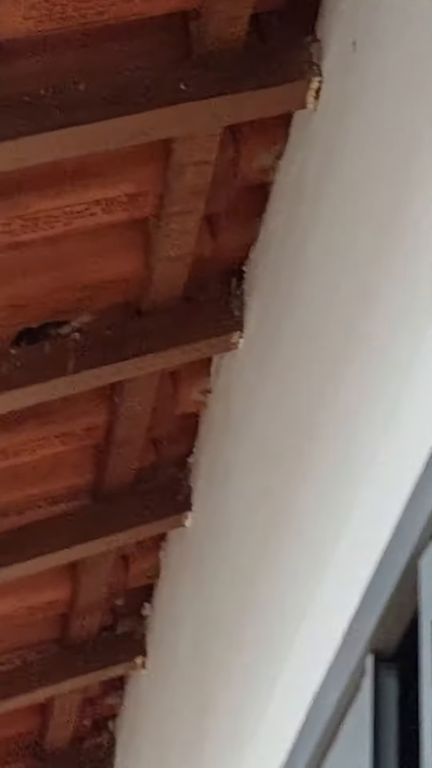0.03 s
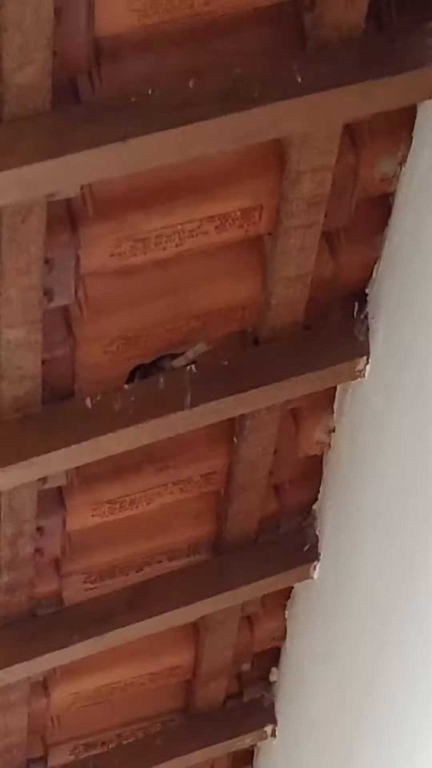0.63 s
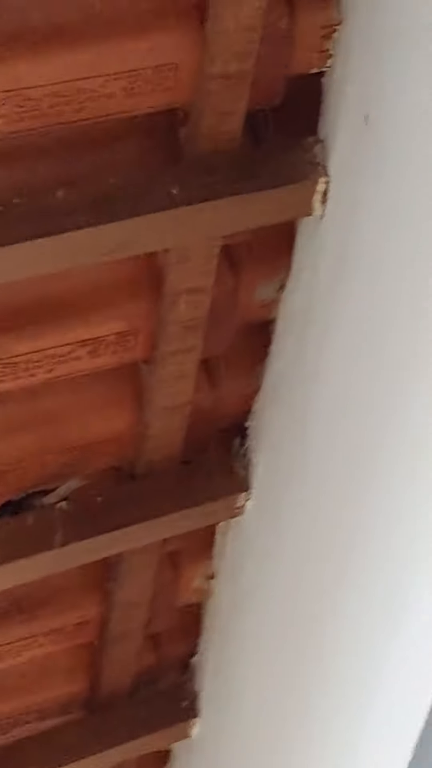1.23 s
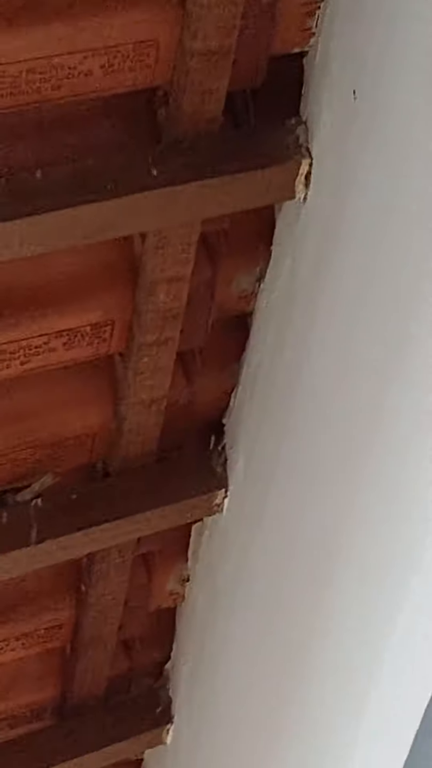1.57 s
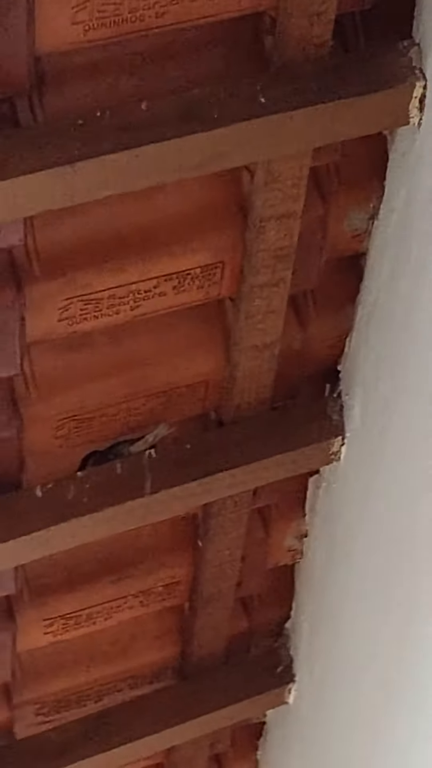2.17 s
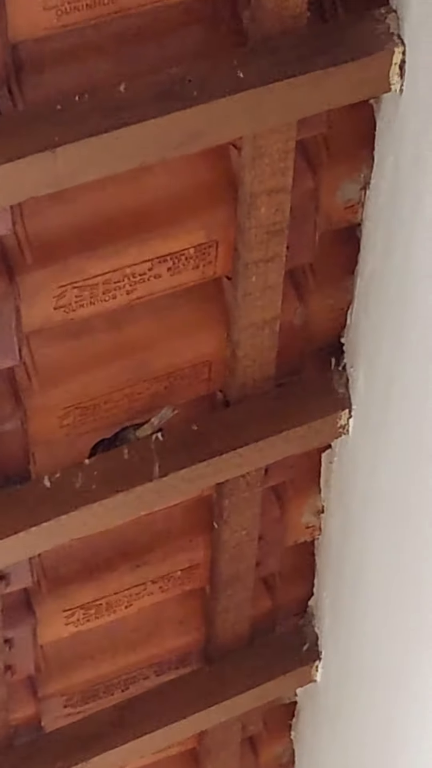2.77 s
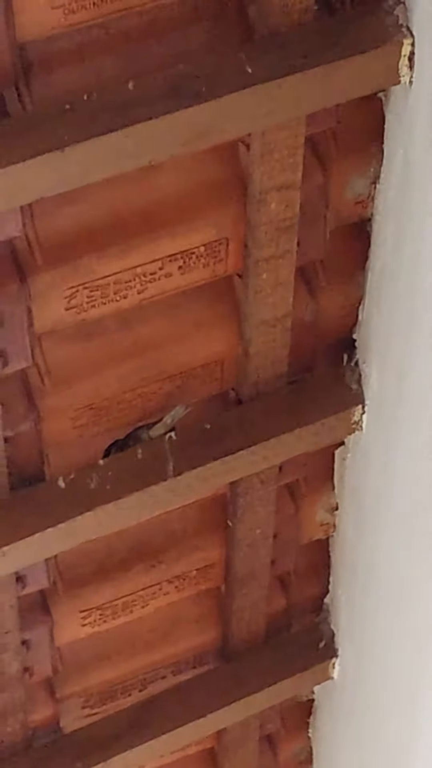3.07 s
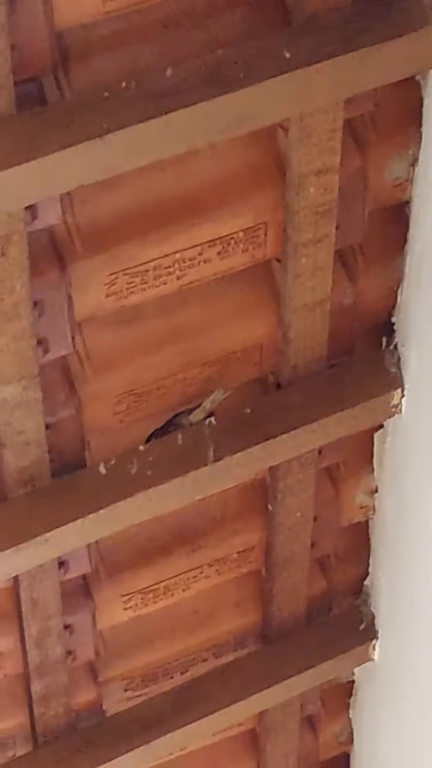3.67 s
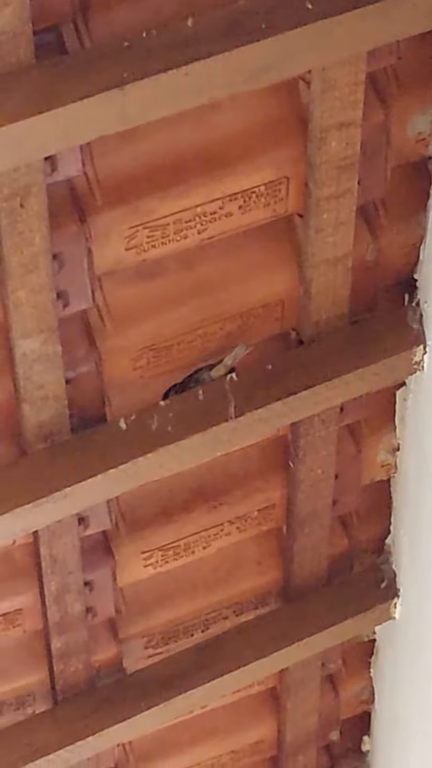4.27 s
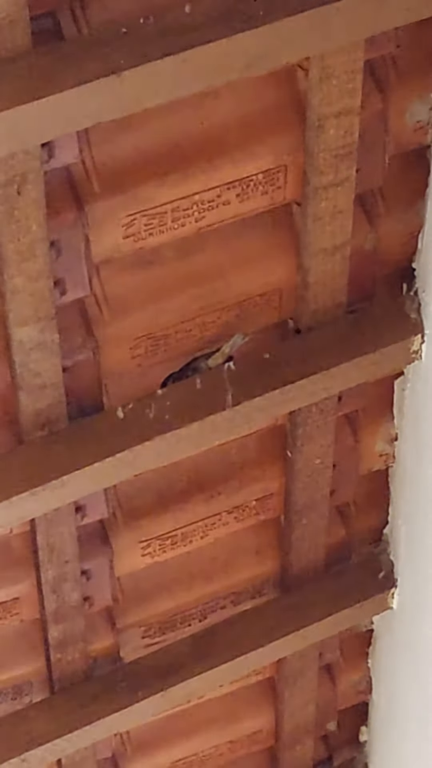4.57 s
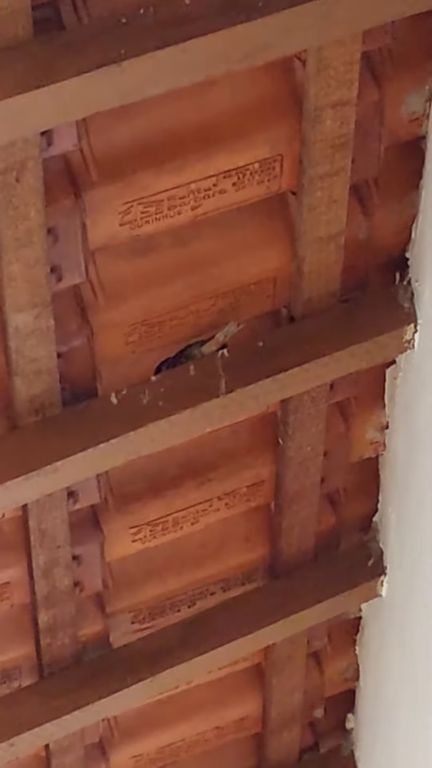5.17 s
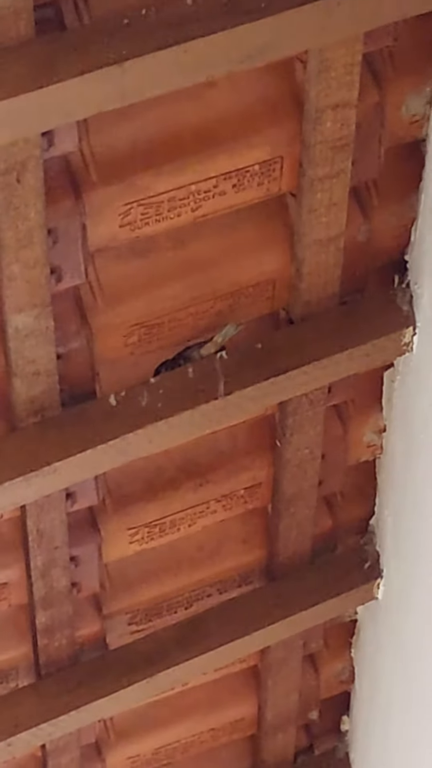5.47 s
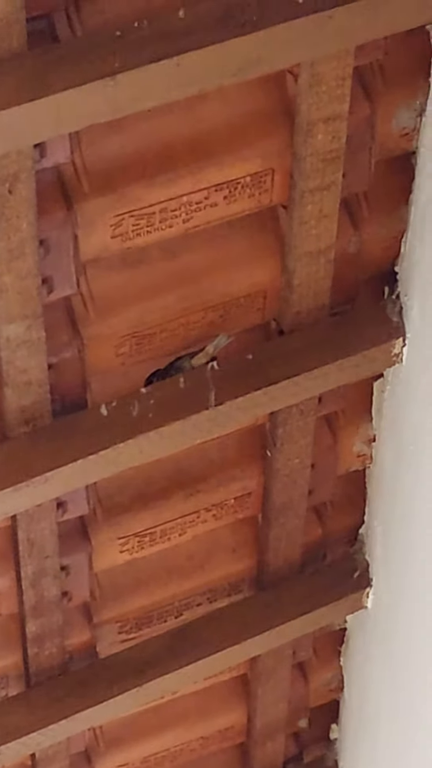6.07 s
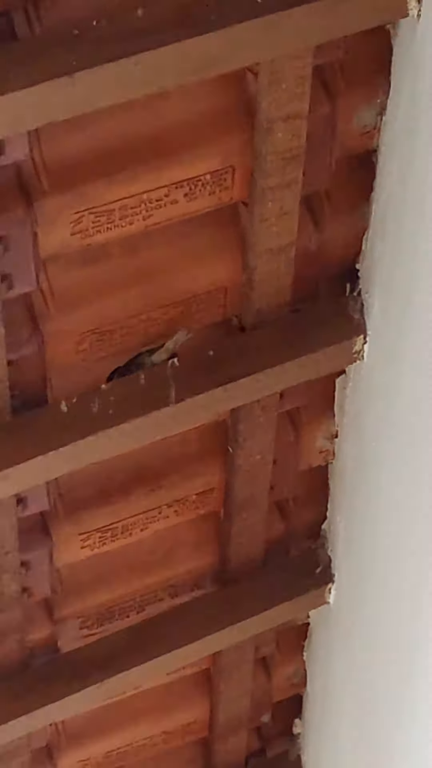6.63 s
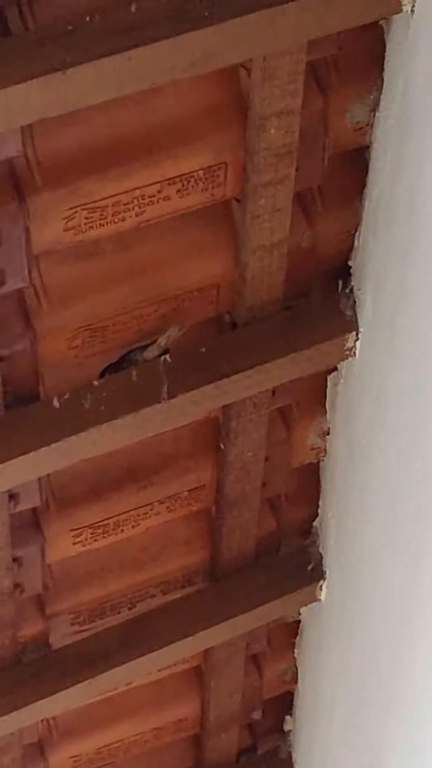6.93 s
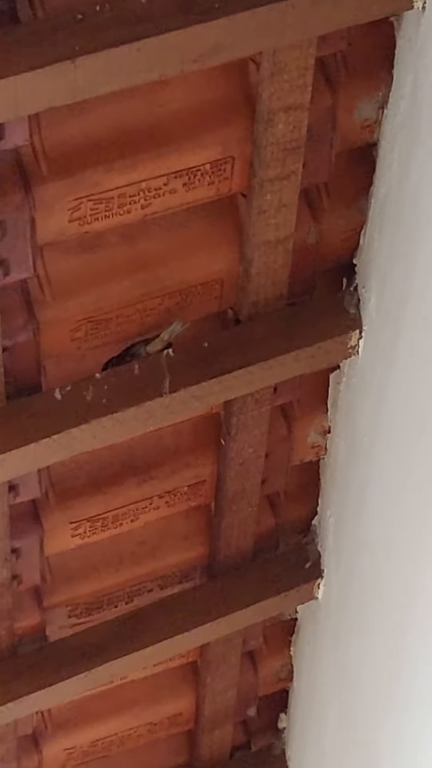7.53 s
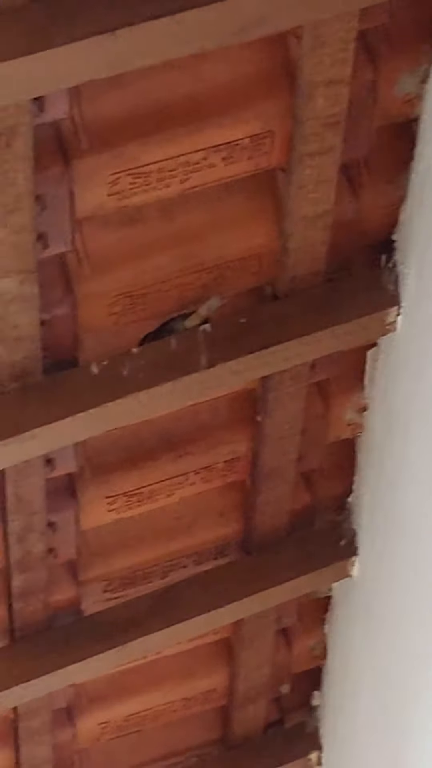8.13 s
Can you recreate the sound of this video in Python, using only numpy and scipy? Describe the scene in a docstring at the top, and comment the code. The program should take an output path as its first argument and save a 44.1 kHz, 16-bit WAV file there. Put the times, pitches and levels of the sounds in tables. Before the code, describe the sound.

A small bird chirps sharply five times, echoing under a roof, over faint peeps, low wind gusts and distant traffic.

```python
"""Under the eaves of a tiled roof, a small bird chirps five times; walls and tiles throw each chirp back.
A second bird answers farther off with thin, high peeps, and a third whistles once in the distance.
Each call is a nearly pure tone that slides in pitch; the chirps also carry a rasp of noise.
Gusts of wind (swells of deep noise) rumble over the wash of distant traffic, a fine hiss and a low hum,
with a few faint ticks and rustles."""
import sys
import numpy as np
from scipy import signal
from scipy.fft import rfft, irfft
from scipy.io import wavfile
from scipy.ndimage import uniform_filter1d

SR = 44100
rng = np.random.default_rng(int(sys.argv[2]) if len(sys.argv) > 2 else 0)


def digitize_waveform(pressure):
    """Quantize a signal to 16-bit integers and store it at the path in sys.argv[1].

    Rows of a 2-D input are taken as channels; values are limited to [-1, 1].
    """
    field = np.atleast_2d(pressure).T
    bounded = np.clip(field, -1, 1)
    quanta = np.round(bounded * 32767).astype(np.int16)
    wavfile.write(sys.argv[1], SR, quanta)


N = 366030
TIME = np.arange(N) / SR
BINS = np.fft.rfftfreq(N, 1 / SR)

# how alike the background is on the left and right: (frequency [Hz], likeness [-1 to 1])
LIKENESS = [(50, 1), (250, 0.6), (500, 0.85), (1000, 0.13), (2000, -0.15), (4000, 0.02), (16000, -0.05)]


def gain_of(db):
    """Turns decibels into a factor to multiply a sound by."""
    return 10 ** (np.asarray(db) / 20)


def evened(x):
    """Scales a signal to an average strength (rms) of 1."""
    return x / np.sqrt(np.mean(x ** 2) + 1e-20)


def read(points, hz):
    """Looks up a table at the frequencies hz, on a scale of octaves."""
    f, value = np.transpose(points)
    return np.interp(np.log(hz + 1), np.log(f + 1), value)


def follow(rows, t):
    """Looks up every column of a table at the times t."""
    times, *columns = np.transpose(rows)
    return [np.interp(t, times, column) for column in columns]


def add(mix, start, sound):
    """Mixes a sound in, beginning at start seconds."""
    at = round(start * SR)
    sound = sound[..., max(-at, 0):]
    part = mix[..., max(at, 0):][..., :sound.shape[-1]]
    part += sound[..., :part.shape[-1]]


def coloured(x, colour):
    """Gives noise a colour (its mix of low and high frequencies), at strength 1."""
    n = x.shape[-1]
    return evened(irfft(rfft(x) * gain_of(read(colour, np.fft.rfftfreq(n, 1 / SR))), n))


def wander(n, rate_hz):
    """A smooth random wobble of strength 1; a higher rate makes it quicker."""
    hz = np.fft.rfftfreq(n, 1 / SR)
    return evened(irfft(rfft(rng.standard_normal(n)) * np.exp(-(hz / rate_hz) ** 2) * (hz > 0), n))


def noise_pair(colour, likeness):
    """Coloured noise for left and right; at likeness 1 both sides move together."""
    # which side is louder: (frequency [Hz], left minus right [dB])
    balance = [(50, -1), (130, 1.5), (300, 0.4), (1000, 0), (2200, -1), (4000, -0.9), (8000, 3.5),
               (12000, 2.2)]
    lean = gain_of(read(balance, BINS) / 2)
    left, other = rfft(rng.standard_normal((2, N)))
    right = likeness * left + np.sqrt(1 - likeness ** 2) * other
    return coloured(irfft(np.array([left * lean, right / lean]), N), colour)


def traffic(boost_db=2.5, surge_db=.9, tyre_swell_db=3):
    """Distant traffic: a surging wash, with two bands of tyre noise that swell on their own."""
    # colour of the wash: (frequency [Hz], level [dB])
    wash_colour = [(100, -51), (300, -7.5), (450, 2), (640, 1), (900, -1.5), (1100, -2.5), (1350, -5.5),
                   (1700, -6), (2050, -6), (2600, -8.5), (3000, -13), (4400, -13.5), (6300, -23),
                   (8500, -32.5)]
    # its slow rise and fall: (time [s], level [dB])
    loudness = [(0, -51.5), (.4, -49), (1.2, -49.5), (2.1, -52.5), (3.7, -51), (5.2, -51.5), (5.9, -50),
                (6.7, -52.5), (7.1, -51.3), (7.5, -52.5), (8.3, -52)]
    # tyre noise: (colour as (frequency [Hz], level [dB]) points, level added to that rise and fall [dB])
    tyres = [([(700, -40), (1000, -2), (1130, 1), (1450, -37)], -11), ([(1500, -38), (2000, 1),
             (2550, -1.5), (3100, -37)], -9.5)]
    likeness = read(LIKENESS, BINS)
    slow_db = follow(loudness, TIME)[0]
    out = noise_pair(wash_colour, likeness)
    out *= gain_of(boost_db + slow_db + surge_db * wander(N, rate_hz=18))
    for colour, db in tyres:
        band = noise_pair(colour, likeness)
        out += band * gain_of(db + slow_db + tyre_swell_db * wander(N, rate_hz=6.5))
    return out


def air_hiss(flicker_db=1.1):
    """The fine hiss of the air: high noise whose level flickers."""
    # colour of the hiss: (frequency [Hz], level [dB])
    colour = [(2000, -0.5), (5000, 8.5), (7000, 6.5), (8500, -2.5), (10000, 0), (11700, 2), (13500, -2.5),
              (16000, -5)]
    # its slow rise and fall: (time [s], level [dB])
    loudness = [(0, -60.5), (.7, -58), (2, -61), (2.8, -63), (4.0, -61.5), (4.4, -58.5), (4.9, -61.5),
                (6, -58.5), (6.6, -64.5), (7.25, -60.5), (7.85, -63), (8.3, -59)]
    hiss = noise_pair(colour, read(LIKENESS, BINS))
    return hiss * gain_of(follow(loudness, TIME)[0] + flicker_db * wander(N, rate_hz=34))


def hum(waver=0.00667):
    """A low hum of five pure tones, each wavering a little in pitch."""
    # the tones: (pitch [Hz], level [dB])
    tones = [(59.2, -53), (123.8, -49.5), (279, -60), (619, -69.5), (1098, -72)]
    out = np.zeros(N)
    for hz, db in tones:
        pitch = hz * (1 + waver * wander(N, rate_hz=7.04))
        out += gain_of(db) * evened(np.sin(2 * np.pi * np.cumsum(pitch) / SR))
    return out


def gust_levels(rise_shape=1.65, fall_shape=1.08):
    """Gusts swell and die over a steady breeze. Gives buffeting, rumble and rush over time, in dB."""
    # the breeze between gusts: (buffeting [dB], rumble [dB], rush [dB])
    breeze = (-44, -45.5, -49.5)
    # gusts: (peak time [s], rumble [dB], rise [s], fall [s],
    # buffeting above the rumble [dB], rush above the rumble [dB])
    gusts = [(.42, -34.5, 0.072, 0.14, -1.5, -10), (.6, -32, 0.14, 0.085, -5, -6),
             (.85, -34, 0.085, 0.25, -11, -10), (1.14, -29, 0.065, .045, -8, -6.5),
             (1.209, -21.5, .018, 0.037, 1, -9), (1.265, -24, 0.022, .045, 6.5, -8.5),
             (1.338, -25.5, 0.014, .025, 2, -7), (1.41, -25.5, 0.062, 0.077, -15, -5),
             (1.7, -35, 0.14, 0.18, 1.5, -7.5), (2.05, -34, 0.055, 0.085, 0, -6),
             (2.25, -35, 0.078, 0.11, -9, -4), (2.42, -40, 0.043, 0.041, 7.5, -5.5),
             (2.56, -34.5, 0.044, 0.065, -3, -9), (2.87, -31.5, 0.1, 0.13, 1.5, -5),
             (3.38, -23, 0.074, 0.13, -6.5, -7), (3.8, -30.5, 0.066, 0.19, -1.5, -7.5),
             (4.04, -27.5, 0.09, 0.048, -7, -11), (4.47, -39.5, 0.13, 0.12, 3, -8),
             (4.72, -37.5, 0.12, 0.25, -0.5, -9), (5.5, -36.5, 0.19, 0.16, 2.5, -9),
             (5.77, -30, 0.17, 0.1, 0, -13.5), (6.08, -35.5, 0.12, 0.24, 1, -10),
             (6.8, -42, 0.087, 0.12, 4.5, -17), (7.04, -44, 0.052, 0.06, 11.5, -8),
             (7.9, -50.5, 0.041, 0.042, 16.5, -10)]
    power = gain_of(breeze)[:, None] ** 2 * np.ones(N)
    for peak, db, rise, fall, buffet_db, rush_db in gusts:
        gap = abs(TIME - peak)
        # a gust swells like a bell curve, then drops with a long tail
        away = np.where(TIME < peak, (gap / rise) ** rise_shape, (gap / fall) ** fall_shape)
        power += gain_of([[db + buffet_db], [db], [db + rush_db]]) ** 2 * np.exp(-np.minimum(away, 20))
    return 10 * np.log10(power)


def turbulence(colour, db, likeness, span_s=0.14):
    """Churning air: low noise with its own swells smoothed out, so that its level follows db."""
    noise = noise_pair(colour, likeness)
    power = uniform_filter1d((noise ** 2).mean(0), round(span_s * SR))
    power = uniform_filter1d(power, round(span_s * SR / 2))
    return gain_of(db) * noise / np.sqrt(abs(power) + 1e-9)


def wind():
    """Gusts buffet, rumble and rush, nearly alike on both sides."""
    # colours of the deep buffeting, the rumble and the higher rush: (frequency [Hz], level [dB])
    buffet = [(15, -39), (31, -25), (39, -10), (48, -6.5), (59, 3), (68, 1.5), (78, -5), (95, -7.5),
              (120, -43), (1000, -130)]
    rumble = [(65, -29), (95, -8.5), (120, 0.5), (138, 0), (147, 0), (158, -0.5), (185, -3), (220, -6),
              (260, -23), (1500, -130)]
    rush = [(150, -29), (220, -2), (255, -2.5), (280, -1.5), (330, -5.5), (400, -16), (550, -27.5),
            (1000, -41), (8000, -120)]
    buffet_db, rumble_db, rush_db = gust_levels()
    return (turbulence(buffet, buffet_db - 0.3, likeness=0.98)
            + turbulence(rumble, rumble_db + 0.7, likeness=0.97)
            + turbulence(rush, rush_db - 1, likeness=0.88))


def puff(db, hz, octaves, rise, fade):
    """A puff of noise around hz that swells, then drops 60 dB in fade seconds."""
    t = TIME[:SR // 2]
    f = np.fft.rfftfreq(len(t), 1 / SR)
    band = np.exp(-.5 * (np.log2((f + 1) / hz) / octaves) ** 2)
    noise = irfft(rfft(rng.standard_normal((2, len(t)))) * band)
    return evened(noise) * np.minimum(t / rise, 1) * gain_of(db - 60 * np.maximum(t - rise, 0) / fade)


def ticks_and_rustles():
    """Small noises close by: short puffs make dry ticks, longer ones soft rustles."""
    # ticks: (time [s], level [dB], centre frequency [Hz])
    ticks = [(.438, -52, 10000), (.704, -50, 8460), (.726, -56, 14000), (1.582, -55, 11000),
             (4.103, -55, 11000), (4.533, -50, 11000), (5.303, -50, 14300), (5.43, -54, 9000),
             (5.703, -52, 8000), (7.666, -55, 8000), (8.089, -54, 9000)]
    # rustles: (time [s], level [dB], centre frequency [Hz], width [octaves], rise [s], fade [s])
    rustles = [(0.209, -50.5, 4480, 1, 0.02, 0.27), (.505, -52.5, 13500, 0.43, .008, 0.4),
               (1.12, -62, 11000, .6, .02, .5), (1.823, -54.5, 5830, 0.5, 0.017, 0.16),
               (2.96, -49.5, 2400, .7, 0.055, 0.32), (3.0, -66, 11600, .4, .03, 0.24),
               (3.86, -52, 2000, 0.71, 0.034, 0.27), (4.275, -58, 6000, .8, .008, .25),
               (4.535, -59, 11000, .5, .008, .3), (4.691, -58.5, 6200, 0.29, 0.021, 0.48),
               (4.96, -60, 11970, .6, .04, 0.51), (5.289, -55, 2800, 0.63, 0.025, .25),
               (5.79, -58, 7000, .8, 0.019, 0.26)]
    out = np.zeros((2, N))
    for start, db, hz in ticks:
        add(out, start, puff(db, hz, octaves=0.46, rise=.0005, fade=.019))
    for start, *rustle in rustles:
        add(out, start, puff(*rustle))
    return out


def eaves(x, direct_db, tail_db, right_db=1, linger=1, build_s=0.0013, lag_s=.0003):
    """A call under the roof: the direct sound, a few strong echoes and a tail of many tiny ones."""
    # first echoes from tiles, beams and walls: (delay [s], left gain [factor], right gain [factor])
    echoes = [(.0031, 0.6, -0.22), (.0074, -0.11, .8), (0.0112, 0.5, 0.35), (0.0235, 0.6, 0.18),
              (0.049, -.33, -.3), (.067, -0.29, 0.11), (0.093, -0.24, 0.0062)]
    # the tail dies faster in the treble: (frequency [Hz], time to drop 60 dB at linger 1 [s])
    fade_times = [(3200, 0.8), (3650, 0.69), (4150, 0.68), (4600, 0.65), (5600, 0.61), (7000, 0.56),
                  (13000, 0.35)]
    taps = np.zeros((2, SR))
    slots = np.arange(100, SR - 20, 20)  # one tiny echo somewhere in every 20 samples
    arrivals = slots + rng.integers(0, 20, (2, len(slots)))
    np.put_along_axis(taps, arrivals, rng.choice([-1, 1], arrivals.shape), 1)
    taps *= gain_of(3 * wander(SR, rate_hz=120))  # they come in louder and softer bunches
    hz, t, bands = signal.stft(taps, SR, nperseg=256)
    fade = gain_of(-60 * t / (linger * read(fade_times, hz)[:, None]))
    tail = signal.istft(bands * fade, SR)[1][:, :SR]
    tail *= 1 - np.exp(-TIME[:SR] / build_s)
    room = gain_of(tail_db) * tail / np.linalg.norm(tail, axis=1, keepdims=True)
    room[0, 0] += gain_of(direct_db)
    room[1, round(lag_s * SR)] += gain_of(direct_db)  # the sound reaches the right side later
    for delay, *sides in echoes:
        room[:, round(delay * SR)] += gain_of(direct_db) * np.array(sides)
    return signal.fftconvolve(x[None], room, axes=1)[:, :N] * gain_of([[-right_db / 2], [right_db / 2]])


def syrinx(hz, db, jitter, jitter_hz=600, second_db=-42, third_db=-39.5):
    """A bird's voice box: a nearly pure tone with an unsteady pitch and two weak, blurred overtones."""
    pitch = hz * (1 + jitter * wander(len(hz), jitter_hz))
    angle = 2 * np.pi * np.cumsum(pitch) / SR
    blur = 1.7 * wander(len(hz), rate_hz=700)
    second = gain_of(second_db) * np.sin(2 * angle + blur)
    third = gain_of(third_db) * np.sin(3 * angle + blur)
    return gain_of(db) * evened(np.sin(angle) + second + third) * signal.windows.tukey(len(hz), .04)


def peeping_bird(pitch_hz=5600, sag_hz_per_s=6.8):
    """Thin peeps that each swell twice; the series slowly sinks in pitch."""
    # peeps: (time [s], level [dB], length [s])
    peeps = [(-.1, -52, .11), (.466, -56.5, 0.1), (1.1, -58, 0.13), (1.738, -58, 0.12), (2.392, -60, 0.12),
             (3.006, -57.5, 0.12), (3.63, -62, 0.14), (4.244, -62, 0.092), (4.89, -59, 0.099),
             (5.593, -61, 0.12), (6.333, -59.5, 0.098), (7.052, -61, 0.09), (7.756, -58.5, 0.09)]
    # the course of each peep: (share of its length [0 to 1], pitch [factor], level [dB])
    shape = [(0, 1.012, -12), (.14, 1.01, 1), (.32, .97, 1.5), (.48, .995, -6), (.65, 1.006, 2),
             (.87, .972, 2), (1, .945, -9)]
    out = np.zeros(N)
    for start, db, length in peeps:
        bend, effort_db = follow(shape, np.linspace(0, 1, round(length * SR)))
        hz = (pitch_hz - sag_hz_per_s * start) * bend
        add(out, start, syrinx(hz, db + effort_db, jitter=0.022, jitter_hz=418))
    return out


def whistling_bird(start_s=7.09, length_s=.27, from_hz=3200, to_hz=3470, flutter_db=5):
    """One faint, rising whistle whose level flutters."""
    out = np.zeros(N)
    n = round(length_s * SR)
    swell = signal.windows.tukey(n, .2) * evened(gain_of(flutter_db * wander(n, rate_hz=25)))
    add(out, start_s, swell * syrinx(np.linspace(from_hz, to_hz, n), db=-67, jitter=0.02))
    return out


def rough_noise(n, colour, flicker_db, rate_hz):
    """Coloured noise made rough by a quick flicker in level."""
    return coloured(rng.standard_normal(n), colour) * evened(gain_of(flicker_db * wander(n, rate_hz)))


def chirp_note(t, top, dip, arch, accent_db, arch_db, drift=0.0067, flutter_db=2.5):
    """A chirp's main tone sweeps down, holds a top note, dips, arches up and trails off low."""
    # how hard the bird sings: (time in the chirp [s], level [dB])
    effort = [(-.04, -50), (-.026, -24), (-.008, -20), (-.003, -12), (.002, -2), (.011, -.5), (.021, 0),
              (.032, 2), (.041, 2), (.05, -6), (.062, -10), (.071, -4), (.082, 2.5), (.091, -0.5),
              (.101, -7), (.113, -20), (.13, -26.5)]
    # the tune: (time in the chirp [s], pitch [Hz])
    tune = [(-.03, 1.6 * top), (-.019, 1.2 * top), (-.012, 1.03 * top), (-.005, .93 * top),
            (0, .975 * top), (.01, 1.005 * top), (.029, top), (.039, .96 * top),
            (.05, dip), (.061, dip), (.072, 1.03 * dip), (.081, .97 * arch), (.091, 1.01 * arch),
            (.099, .82 * arch), (.11, .79 * arch), (.13, .68 * arch)]
    hz = uniform_filter1d(follow(tune, t)[0], size=180)  # round off the corners
    hz *= 1 + drift * wander(len(t), rate_hz=80)
    db = follow(effort, t)[0] + np.interp(t, [.028, .04, .055, .075], [0, accent_db, 0, arch_db])
    db -= .004 * np.maximum(4100 - hz, 0)  # the voice weakens as it sinks below 4100 Hz
    return syrinx(hz, db + flutter_db * wander(len(t), rate_hz=82), jitter=0.012)


def near_bird(sizzle_db=-31):
    """Five chirps, each a hoarse note with an opening squeak and rasp, a second voice and a sizzle."""
    # chirps: (time [s], level [dB], top pitch [Hz], dip pitch [Hz], arch pitch [Hz], stretch [factor],
    # accent on the fall to the dip [dB], arch boost [dB], rasp [dB], hoarseness [dB], upper voice [dB])
    chirps = [(0.814, -27.8, 4446, 3780, 4300, 0.95, 5, 4.5, -17, -24, -18),
              (2.398, -32, 4495, 3730, 4330, 1.03, 3, 1.5, -14.5, -17, -13),
              (4.375, -30.7, 4460, 3748, 4340, 0.98, 6.5, 3.5, -14.5, -18, -17),
              (6.073, -31.7, 4440, 3760, 4255, 1, 0, 2.5, -14.5, -14.5, -20),
              (8.229, -28, 4490, 3870, 4260, 0.96, 3, 5, -17, -29, -16)]
    # the other side of the voice box, above the dip: (time in the chirp [s], pitch [Hz], level [dB])
    upper_voice = [(.04, 5710, -30), (.058, 5500, -6), (.074, 5410, -.5), (.086, 5250, -15),
                   (.1, 5100, -40)]
    # the thin squeak that leads in: (time in the chirp [s], pitch [Hz], level [dB])
    lead_in = [(-.034, 6890, -50), (-.02, 6720, -24), (-.002, 6350, -18), (.016, 6550, -21.5),
               (.03, 6400, -36), (.05, 6300, -70)]
    # the rise and fall of the rasp: (time in the chirp [s], level [dB])
    rasp_shape = [(-.04, -18), (-.024, -3.5), (-.005, -0.5), (.017, -1), (.03, -14), (.06, -17), (.08, -17),
                  (.11, -33)]
    # colours of the rasp and the sizzle: (frequency [Hz], level [dB])
    rasp_colour = [(2500, -35), (3500, -6), (4300, 2), (4900, -1), (5500, 9), (5950, 5.5), (6550, 7),
                   (7000, 3), (7500, -9), (9000, -25), (12500, -27), (16000, -35)]
    sizzle_colour = [(6500, -21), (7800, 4), (8200, -4), (8650, -1), (9300, -7), (10500, -4), (11500, .5),
                     (13200, 0), (14000, -9), (16000, -11)]
    out = np.zeros(N)
    t = np.arange(-.04, .14, 1 / SR)  # the top note begins at 0
    n = len(t)
    for start, db, top, dip, arch, stretch, accent_db, arch_db, rasp_db, hoarse_db, upper_db in chirps:
        note = chirp_note(t / stretch, top, dip, arch, accent_db, arch_db)
        note *= 1 + gain_of(hoarse_db) * wander(n, rate_hz=640)  # a fast quiver makes it hoarse
        upper_hz, upper_effort_db = follow(upper_voice, t / stretch)
        upper = syrinx(upper_hz, upper_db + upper_effort_db, jitter=0.035)
        squeak = syrinx(*follow(lead_in, t), jitter=0.021)
        rasp = rough_noise(n, rasp_colour, flicker_db=5.5, rate_hz=114)
        rasp *= gain_of(rasp_db + follow(rasp_shape, t)[0])
        sizzle = rough_noise(n, sizzle_colour, flicker_db=4.8, rate_hz=220)
        sizzle *= gain_of(sizzle_db) * signal.windows.tukey(n, .5)
        add(out, start + t[0], gain_of(db) * (note + upper + squeak + rasp + sizzle))
    return out


def scene():
    """All the sounds together in stereo; the far birds carry more echo than the near one."""
    near = eaves(near_bird(), direct_db=-4.4, tail_db=-5.7)
    far = eaves(peeping_bird() + whistling_bird(), direct_db=-5.5, tail_db=3, right_db=0.5, linger=1.43)
    return near + far + ticks_and_rustles() + wind() + traffic() + air_hiss() + hum()


def record(dry):
    """Cuts away the highest treble, above 15800 Hz."""
    low_pass = signal.firwin(511, 15800, window=("kaiser", 9), fs=SR)
    return signal.oaconvolve(dry, low_pass[None], "same")


dry = scene()
out = record(dry)
digitize_waveform(out)
```